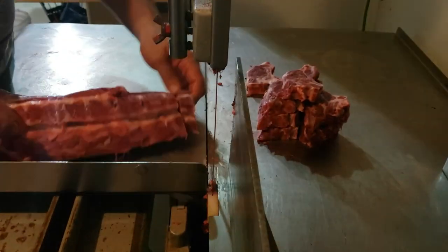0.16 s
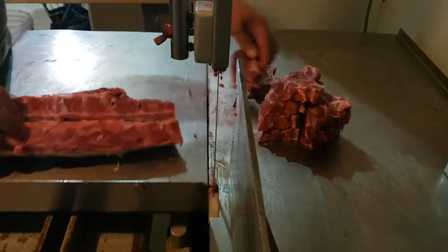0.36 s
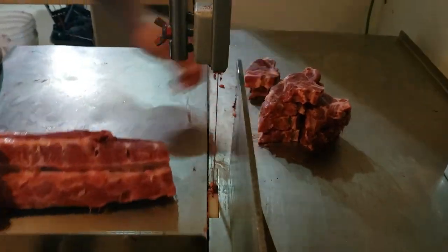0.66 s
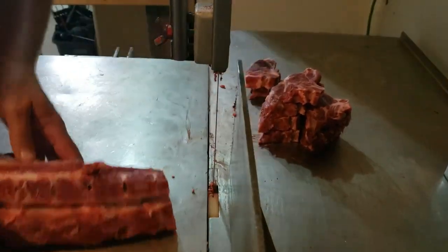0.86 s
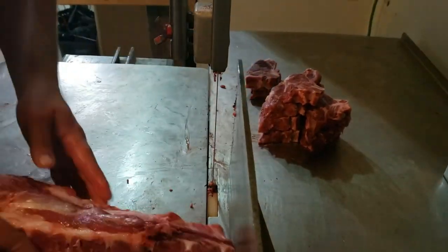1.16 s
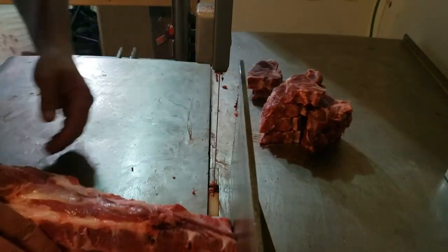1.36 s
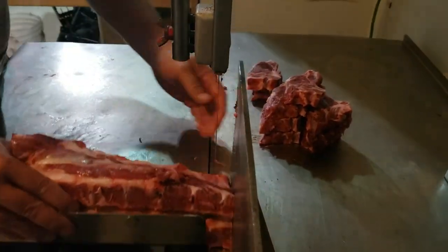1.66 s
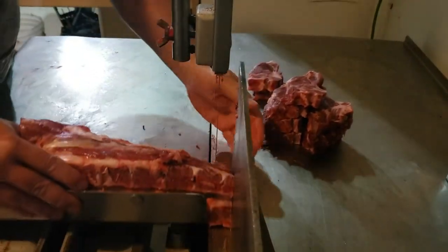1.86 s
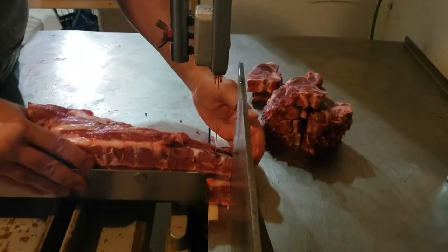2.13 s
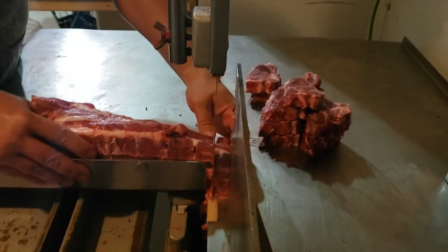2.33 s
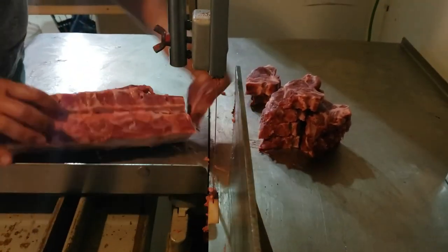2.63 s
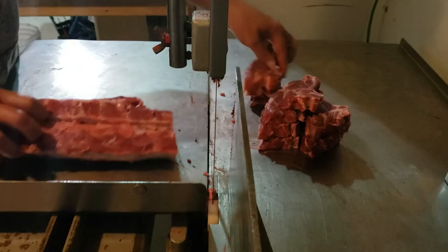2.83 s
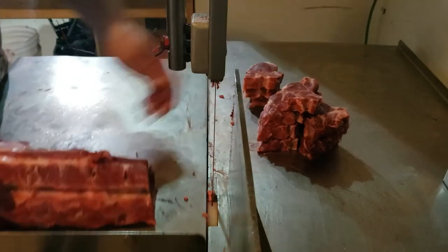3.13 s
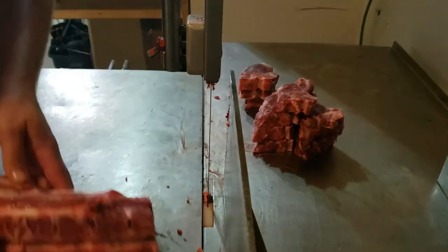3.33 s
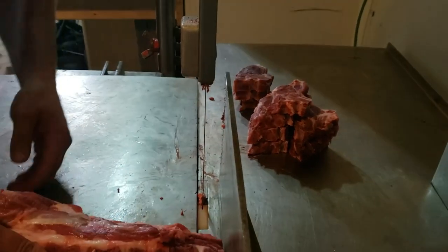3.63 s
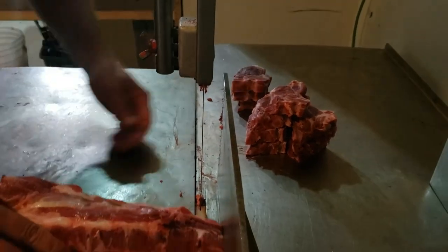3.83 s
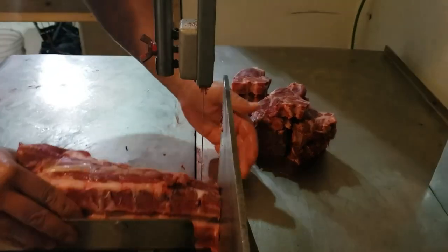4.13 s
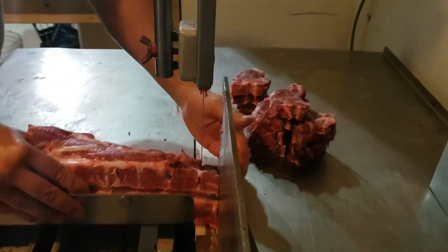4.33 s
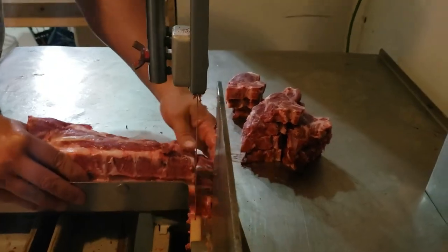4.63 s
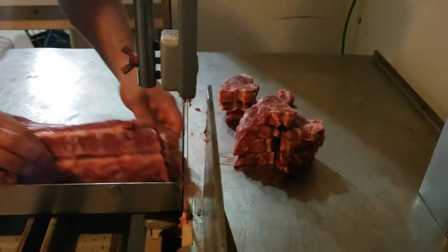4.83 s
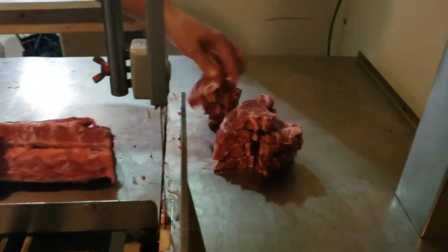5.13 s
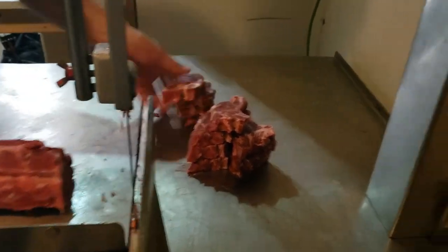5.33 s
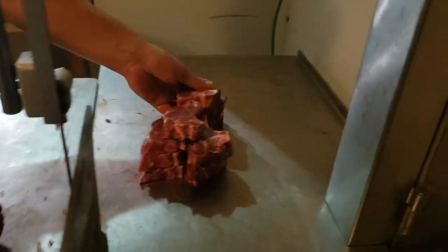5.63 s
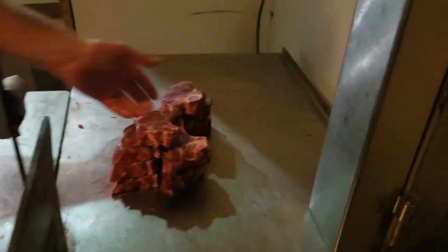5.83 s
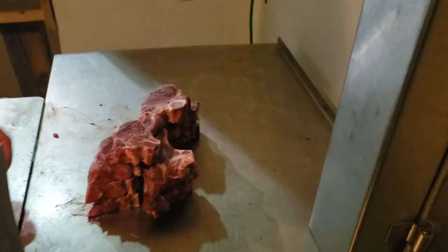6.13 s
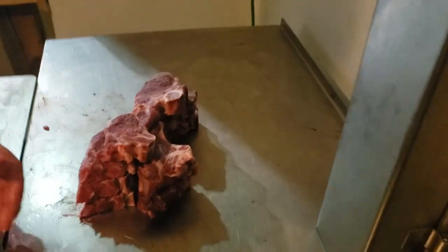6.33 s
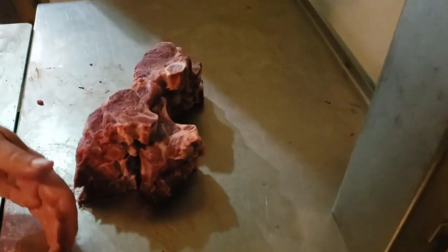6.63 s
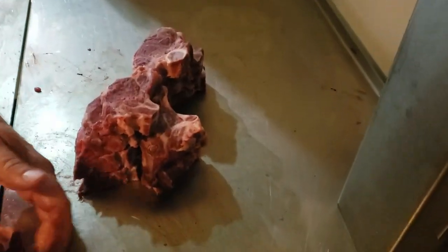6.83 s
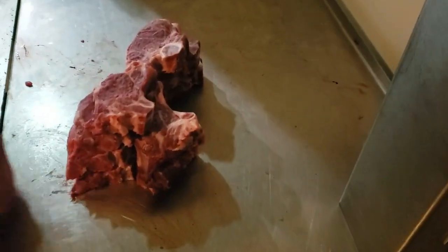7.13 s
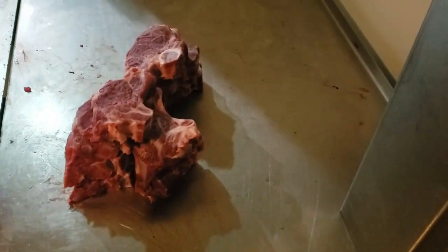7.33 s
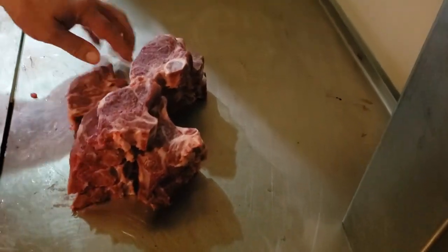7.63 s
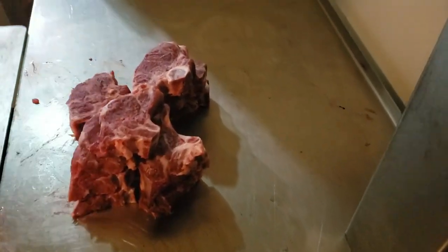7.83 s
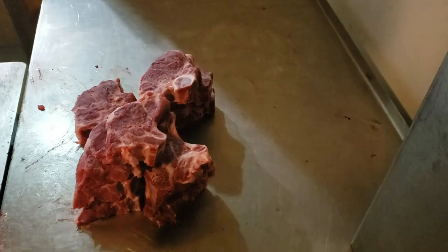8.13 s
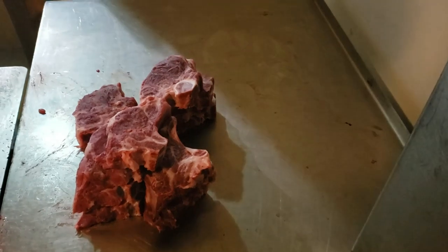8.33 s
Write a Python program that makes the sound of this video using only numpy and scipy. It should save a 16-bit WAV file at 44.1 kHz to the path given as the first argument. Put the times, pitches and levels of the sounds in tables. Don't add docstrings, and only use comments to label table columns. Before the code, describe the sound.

A butcher's band saw hums and hisses steadily in a hard workroom while its blade screams through bone three separate times.

```python
import sys
import numpy as np
from scipy import signal
from scipy.fft import rfft, irfft, next_fast_len
from scipy.io import wavfile
from scipy.ndimage import uniform_filter1d

SR = 44100
rng = np.random.default_rng(int(sys.argv[2]) if len(sys.argv) > 2 else 0)


def output_pcm(signal):
    pcm = np.clip(np.atleast_2d(signal).T, -1, 1) * 32767
    wavfile.write(sys.argv[1], SR, np.round(pcm).astype(np.int16))


def gain_from_db(level_db):
    decades = np.asarray(level_db, float) / 20
    return 10 ** decades


N = 373950

# (time [s], gain [dB])
RECORDER_GAIN = [(0, -3), (.5, -3), (1.7, 3.5), (2.1, 3), (2.45, -5), (3.9, 2), (4.45, 3.5), (4.75, -2),
                 (5.3, -3), (6.2, 5), (6.65, 4.5), (7.05, -9.5), (7.5, -11), (8.48, -6.5)]
# (multiple of the tooth rate [-], level [dB])
TOOTH_TONES = [
    [(1, -12.5), (2, -6), (3, -4), (4, -2), (5, -3), (6, 2), (7, -8.5), (8, -9), (9, -4.5), (10, -2),
     (11, -2.5), (12, 2), (13, 0.5)],
    [(1, -12), (2, -5), (3, -6), (4, -4), (5, -3), (6, 0.5), (7, -9), (8, -8.5), (9, -3.5), (10, 0),
     (11, -2), (12, 0), (13, 2)],
    [(1, -15), (2, -8.5), (3, -11), (4, -9.5), (5, -7.5), (6, -2.5), (7, -16), (8, -14.5), (9, -9.5),
     (10, -3.5), (11, -6.5), (12, -8), (13, 1.5)],
]
TURN_S = (4.8, 6.4)
FREE_TOOTH_HZ = 1171
BLADE_SPLIT_HZ = 8250


def rms_one(x):
    return x / np.sqrt(np.mean(x ** 2) + 1e-20)


def in_time(rows, t):
    s, *columns = np.transpose(rows)
    return [np.interp(t, s, column) for column in columns]


def at_hz(points, hz):
    table_hz, db = np.array(points).T
    return np.interp(np.log(hz), np.log(table_hz), db)


def ramp(t, start, length):
    return np.clip((t - start) / length, 0, 1)


def bump(t, centre, length):
    return np.exp(-((t - centre) / length) ** 2)


def drift(rate_hz, size):
    pole = np.exp(-32 * np.pi * rate_hz / SR)
    coarse = rng.standard_normal(size // 16 + 1002)
    slow = signal.lfilter([1], [1, -2 * pole, pole * pole], coarse)[1000:]
    return np.interp(np.arange(size) / 16, np.arange(len(slow)), rms_one(slow - slow.mean()))


def sides(db):
    half = np.atleast_1d(db) / 2
    return gain_from_db(np.array([half, -half]))


def coloured(spectrum, size, peaks=()):
    # (frequency [Hz], left-right correlation [-])
    likeness = [(60, 0.89), (130, 0.9), (290, 0.79), (640, 0.53), (1410, -0.26), (3100, 0.008),
                (6820, -0.086), (15000, 0.085)]
    # (frequency [Hz], left-right level [dB])
    leaning = [(100, 2), (380, 1.5), (950, 3), (2380, 2), (5000, 0.5), (8100, 3), (15000, 4)]
    fast = next_fast_len(size)
    hz = np.maximum(np.fft.rfftfreq(fast, 1 / SR), 1)
    power = gain_from_db(at_hz(spectrum, np.minimum(hz, 15300))) ** 2
    for centre_hz, width_hz, db in peaks:
        power = power + gain_from_db(db) ** 2 / (1 + (2 * (hz - centre_hz) / width_hz) ** 2) ** 2
    mid, side = rfft(rng.standard_normal((2, fast)))
    alike = np.clip(at_hz(likeness, hz), -1, 1)
    pair = np.sqrt(1 + alike) * mid + np.sqrt(1 - alike) * side * [[1], [-1]]
    lean = gain_from_db(np.array([[0.5], [-0.5]]) * at_hz(leaning, hz))
    return rms_one(irfft(pair * np.sqrt(power) * lean, fast)[:, :size])


def tilt(x, split_hz, top_db, pan_db):
    low = signal.sosfiltfilt(signal.butter(3, split_hz, fs=SR, output="sos"), x)
    return rms_one(low) + rms_one(x - low) * gain_from_db(top_db) * sides(pan_db)


def floor_shaking(t):
    # (frequency [Hz], density [dB per Hz])
    shake_spectrum = [(12, -90), (20, -60), (38, -52), (59, -30), (86, -13), (100, -13), (130, -55),
                      (220, -120)]
    # (time [s], level over the shaking [dB])
    shake_swells = [
        (.06, 7),
        (2.0, 7),
        (2.86, 2),
        (3.24, 7),
        (3.82, 6),
        (4.1, 7),
        (4.96, 5),
        (6.7, 7),
    ]
    swell_length_s = 0.074
    gain_db, = in_time(RECORDER_GAIN, t)
    shake_db = -43 + 0.41 * gain_db
    shake_db = shake_db + sum(db * bump(t, s, swell_length_s) for s, db in shake_swells)
    resonances = [(68.3, 11.0, 0.5), (93, 11, -5.0)]   # Hz, width Hz, dB
    return coloured(shake_spectrum, N, resonances) * gain_from_db(shake_db)


def cabinet(t):
    # (frequency [Hz], density [dB per Hz])
    rumble_spectrum = [(82, -16.5), (140, 5), (153, -0.5), (179, -3), (333, -13.5), (398, -11), (615, -14),
                       (695, -14.5), (898, -18), (2000, -73), (2600, -94), (4400, -120)]
    # (frequency [Hz], width [Hz], level [dB])
    panels = [(160, 2.1, 3), (288.3, 16.5, -1), (323.7, 30, -0.5), (358, 22.5, -1), (458.3, 26, -4.5),
              (584, 16, -10.5), (689.7, 18, -6.5), (844, 33, -14), (979, 34, -10)]
    # (time [s], length [s], level [dB])
    growls = [
        (2.25, 0.17, 4.5),
        (4.556, 0.19, 4),
        (6.68, .08, 5.5),
    ]
    gain_db, = in_time(RECORDER_GAIN, t)
    low_db = -37 + 0.48 * gain_db
    upper_db = -43 + 1.02 * gain_db
    low_db = low_db + sum(db * bump(t, s, length) for s, length, db in growls)
    rumble = tilt(coloured(rumble_spectrum, N, panels), 520, upper_db - low_db, 0.3)
    return rumble * gain_from_db(low_db + 0.9 * drift(9.2, N))


def motor_hum(t):
    # (time [s], level [dB])
    standing_wave = [(0, -23.5), (1.1, -21), (1.3, -23), (1.6, -22.5), (2.5, -22), (3.6, -21), (4.2, -22.5),
                     (5.2, -21), (5.7, -20), (6.0, -18), (6.7, -20.5), (6.8, -29.5), (7.75, -26),
                     (8.05, -27.5), (8.3, -26), (8.48, -27)]
    # (multiple [-], facing the saw, turned away, settled at the table [dB re hum])
    overtones = [
        (2, -29.5, -22, -18.5),
        (3, -31, -30, -41),
        (4, -37.5, -30, -22.5),
    ]
    # (hum multiple [-], wheel multiple [-], level [dB re hum])
    beats = [(1, 1, -24.5), (1, 2, -43), (1, 3, -27), (2, -1, -31.5), (2, 1, -31), (3, 1, -57),
             (3, -1, -42)]
    # (time [s], depth [dB], hold [s])
    ducks = [
        (2.12, 4, 0.16),
        (4.444, 2, 0.18),
        (6.754, 3.5, 0.19),
    ]
    hum_hz, wheel_hz = 119.97, 14.93
    fall_s, rise_s = 0.039, 0.13
    settled_s = 6.76
    right_lag_s = 3.3 / SR

    hum_db, = in_time(standing_wave, t)
    for s, depth_db, hold in ducks:
        hum_db = hum_db - depth_db * (ramp(t, s, fall_s) - ramp(t, s + fall_s + hold, rise_s))

    heard_t = t - np.array([[0], [right_lag_s]])
    hum_turn = 2 * np.pi * hum_hz * heard_t + 0.34 * drift(2.15, N) - 1.1
    wheel_turn = 2 * np.pi * wheel_hz * t + 0.28 * drift(0.46, N) + 1.44
    tones = np.cos(hum_turn)
    for multiple, *aimed_db in overtones:
        db = np.interp(t, [*TURN_S, settled_s], aimed_db) + 1.44 * drift(3.2, N)
        tones = tones + gain_from_db(db) * np.cos(round(multiple) * hum_turn)
    for hum_k, wheel_k, db in beats:
        beat_turn = round(hum_k) * hum_turn + round(wheel_k) * wheel_turn
        tones = tones + gain_from_db(db + 2.8 * drift(0.78, N)) * np.cos(beat_turn)
    return gain_from_db(hum_db) * np.sqrt(2) * tones * sides(0.6)


def idle_blade(t):
    # (frequency [Hz], density [dB per Hz])
    hiss_facing = [(590, -7), (1000, -3.5), (1130, -4), (1500, -7), (1600, -7.5), (2290, -7.5), (3310, -11),
                   (3580, -10.5), (5940, -11), (7220, -9), (8680, -25.5), (14600, -16), (15600, -17)]
    # (frequency [Hz], density [dB per Hz])
    hiss_turned = [(590, -53), (1000, -3), (1230, -3.5), (1460, -5.5), (2400, -7), (3270, -9), (3460, -8.5),
                   (5230, -9), (5740, -4), (6900, -7), (8780, -24), (11200, -14), (15600, -13)]
    # (frequency [Hz], width [Hz], level [dB])
    guides = [(2240, 48, 0), (5740, 250, -5), (6640, 70, 1), (7490, 60, 0.5), (9500, 1100, -22.5)]
    # (time [s], top [dB re hiss], left-right level [dB])
    mic_aim = [
        (0, 1, .3),
        (5.3, 2, 0),
        (5.8, -0.5, .3),
        (6.5, 2, .3),
        (7.1, 2, 2.5),
        (8.48, 4.5, 2.5),
    ]
    gain_db, = in_time(RECORDER_GAIN, t)
    hiss_db = -45 + 0.76 * gain_db
    trace = 0
    for multiple, db in TOOTH_TONES[0]:
        turn = 2 * np.pi * round(multiple) * FREE_TOOTH_HZ * t + 2.4 * drift(51, N)
        trace = trace + gain_from_db(db) * np.cos(turn)
    away = np.interp(t, TURN_S, [0, np.pi / 2])
    hiss = np.cos(away) * coloured(hiss_facing, N, guides[-1:])
    hiss = hiss + np.sin(away) * coloured(hiss_turned, N, guides)
    hiss = hiss + gain_from_db(-21) * rms_one(trace)
    top_db, pan_db = in_time(mic_aim, t)
    return gain_from_db(hiss_db + 5.5 + 0.91 * drift(12.7, N)) * tilt(hiss, BLADE_SPLIT_HZ, top_db, pan_db)


def catches():
    # (time [s], length [s], start [Hz], end [Hz], width [Hz], level [dB])
    squeals = [
        (4.275, 0.12, 4350, 4680, 90, -32.5),
        (6.588, 0.018, 4200, 6400, 900, -32),
        (2.2, 0.071, 6200, 8500, 90, -54),
    ]
    out = np.zeros((2, N))
    for s, length, start_hz, end_hz, width_hz, db in squeals:
        at, size = round(s * SR), round(length * SR)
        turn = 2 * np.pi * np.cumsum(np.linspace(start_hz, end_hz, size)) / SR
        swell = gain_from_db(db) * np.hanning(size) ** 0.5
        for channel in range(2):
            rough = drift(width_hz, N // 8) + 1j * drift(width_hz, N // 8)
            out[channel, at:at + size] += swell * np.real((1 + rough[:size]) * np.exp(1j * turn))
    return out


def scream(orders, tooth_hz, clear):
    size = len(tooth_hz)
    turn = 2 * np.pi * np.cumsum(tooth_hz + 1.2 * drift(25, size)) / SR
    lines = np.zeros((2, size))
    for multiple, db in orders:
        k = round(multiple)
        swell = gain_from_db(db + 2.4 * drift(9, size))
        width_hz = 115 + 2.0 * k ** 2
        for channel in range(2):
            steady = clear * gain_from_db(4.2 * drift(21, size)) / (1 + (k / 9) ** 2)
            rough = (1 - clear) * (drift(width_hz, size) + 1j * drift(width_hz, size))
            phase = k * turn + rng.uniform(0, 2 * np.pi)
            lines[channel] += swell * np.real((steady + rough) * np.exp(1j * phase))
    return rms_one(lines)


def cuts(t):
    # (time [s], bite [dB], brightness [dB])
    feed = [
        [(1.7, -44, -11), (1.85, -37.5, 6), (1.97, -34.5, -7), (2.06, -25, 3), (2.22, -27.5, 5),
         (2.31, -35, -3), (2.35, -28, -9), (2.39, -46.5, -6), (2.45, -45, -4)],
        [(4.1, -53, -7), (4.2, -41, 6), (4.3, -30, -4), (4.35, -29, -4), (4.375, -25.5, 1.5), (4.46, -21, -2.5),
         (4.6, -28, 4), (4.65, -34.5, -2), (4.72, -50, -5)],
        [(6.5, -41.5, 1), (6.63, -32, 0), (6.686, -24, 1.5), (6.722, -29.5, 0), (6.752, -27, 3),
         (6.92, -35, 10), (7.02, -34.5, 9.5), (7.035, -39, -2), (7.12, -64, 0)],
    ]
    # (bone reached [s], lowest tones [dB re bite], clear share [0-1], top left-right at the end [dB])
    bones = [
        (1.85, -9, .55, 7.5),
        (4.25, -11.5, 0.62, 9.5),
        (6.64, -11, .45, 6),
    ]
    # (frequency [Hz], density [dB per Hz])
    sawdust = [(410, -45), (700, -16), (1180, -9), (1510, -0.5), (2280, 5.5), (2740, 3), (3460, 1.5),
               (3890, 3), (4540, 7.5), (5040, 5), (7060, 8.5), (8580, -4.5), (15600, 9)]
    tooth_sag_hz, bone_rise_s, dust_db = 15, 0.098, -6
    out = np.zeros((2, N))
    for rows, bone, orders in zip(feed, bones, TOOTH_TONES):
        bone_s, tones_db, clear, end_pan_db = bone
        span = slice(round(rows[0][0] * SR), round(rows[-1][0] * SR))
        db, bright_db = in_time(rows, t[span])
        size = len(db)
        low_db = tones_db - 0.35 * (db - db.max())
        pan_db = np.linspace(3.5, end_pan_db, size)

        load = signal.lfilter([3e-4], [1, 3e-4 - 1], gain_from_db(db - db.max()))
        load = load / load.max()
        in_bone = ramp(t[span], bone_s, bone_rise_s)
        teeth = scream(orders, FREE_TOOTH_HZ - tooth_sag_hz * load, np.clip(clear, 0, 1))
        dust = (1 - in_bone + in_bone * gain_from_db(dust_db)) * coloured(sawdust, size)
        rasp = in_bone * teeth + dust
        rasp = rasp / np.sqrt(uniform_filter1d(np.mean(rasp ** 2, axis=0), size=3000))

        below = tilt(rasp, BLADE_SPLIT_HZ, -60, 0)
        body = tilt(below, 2900, -low_db, 0) * gain_from_db(low_db)
        top = tilt(rasp, BLADE_SPLIT_HZ, 60, pan_db) * gain_from_db(-60)
        gain = signal.windows.tukey(size, 0.15) * gain_from_db(1.0 + 0.8 * drift(25.0, size))
        out[:, span] = gain * gain_from_db(db) * (body * sides(1.5) + gain_from_db(bright_db + 2.5) * top)
    return out


def scene():
    t = np.arange(N) / SR
    machine = floor_shaking(t) + cabinet(t) + motor_hum(t)
    return machine + idle_blade(t) + catches() + cuts(t)


def band_limit(x):
    return signal.sosfilt(signal.butter(12, 15960, fs=SR, output="sos"), x)


def record(dry):
    rounded = np.tanh(dry / 1.5) * 1.5
    low_pass = signal.ellip(12, 0.5, 60, 15740, fs=SR, output="sos")
    mix = signal.sosfilt(low_pass, rounded)
    return band_limit(mix)


dry = scene()
out = record(dry)
output_pcm(out)
```